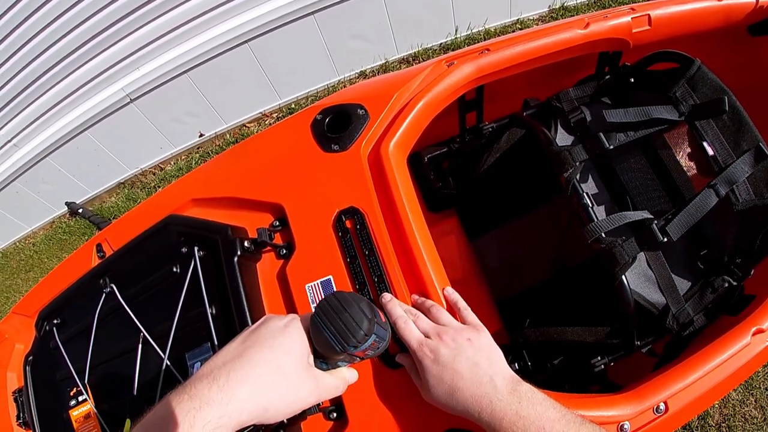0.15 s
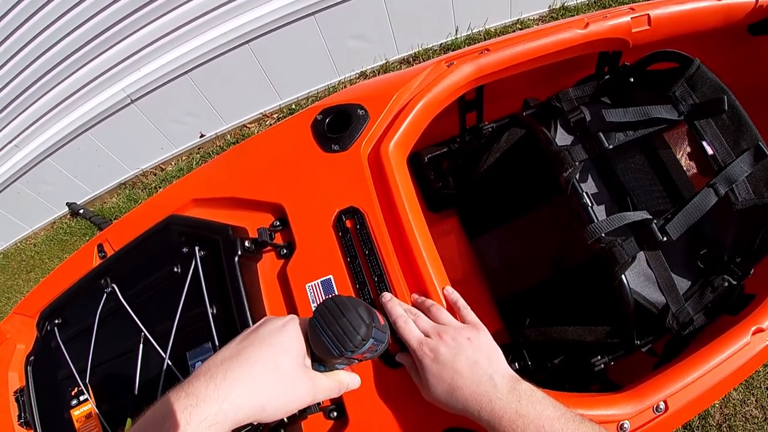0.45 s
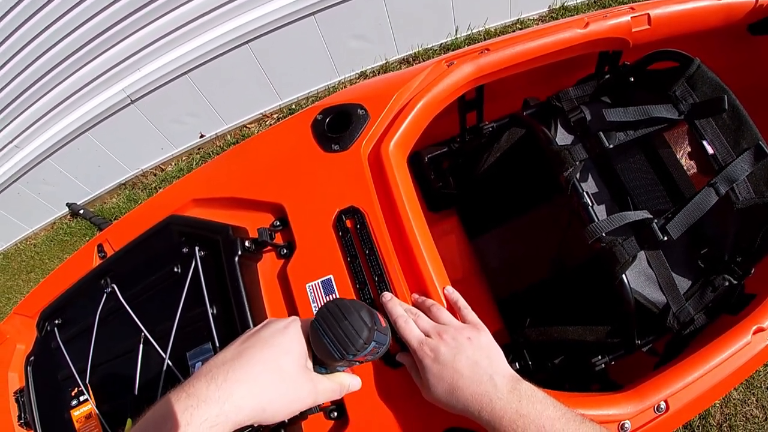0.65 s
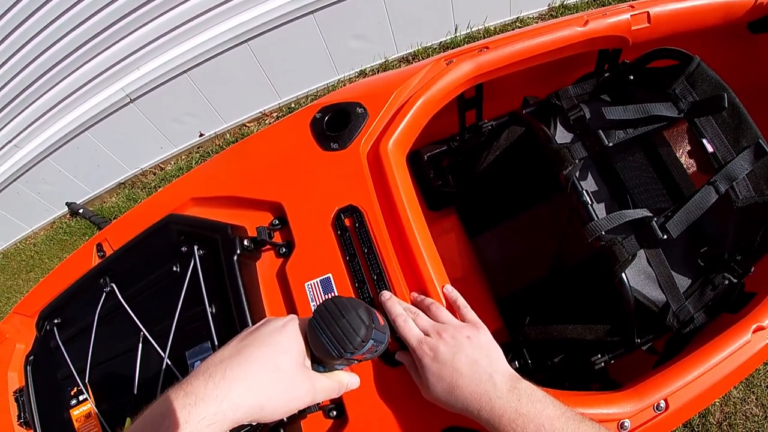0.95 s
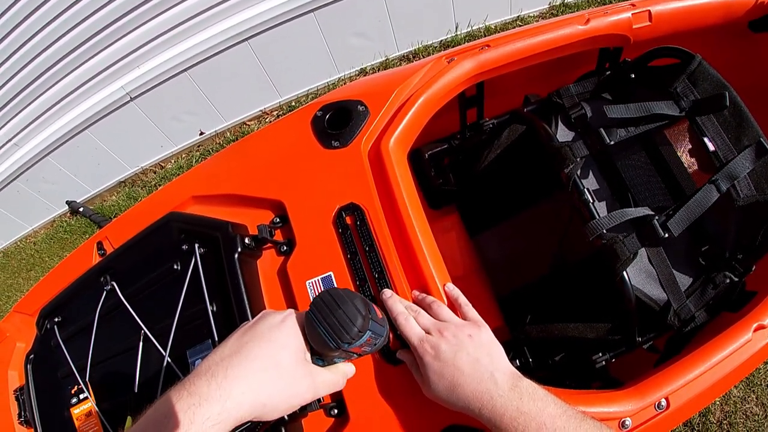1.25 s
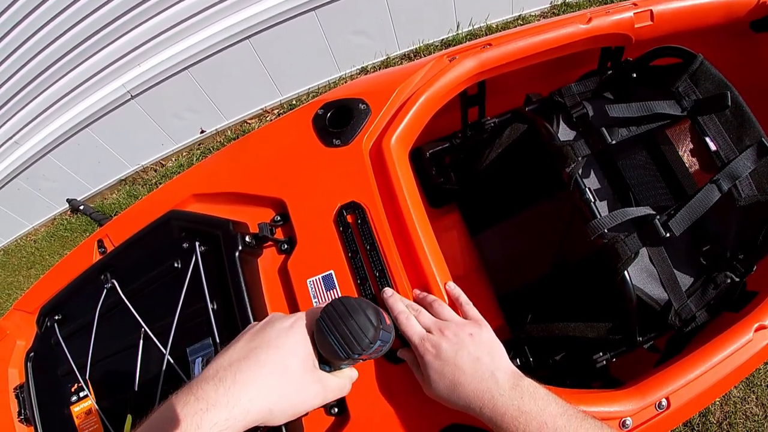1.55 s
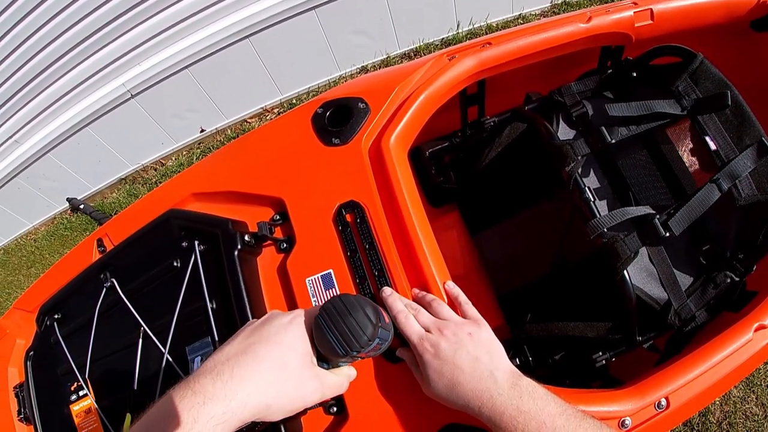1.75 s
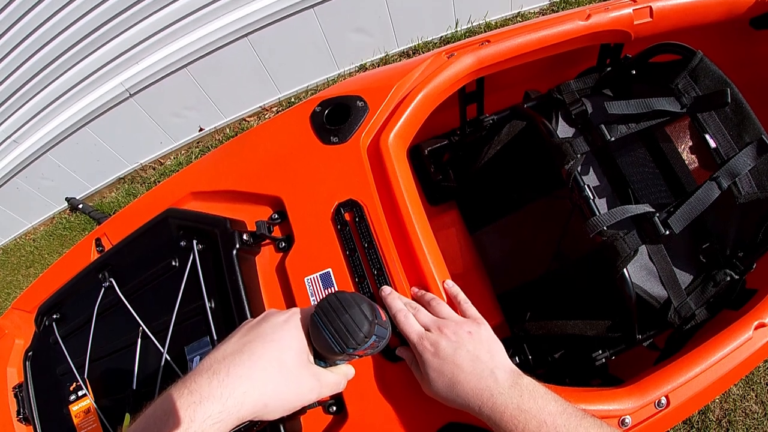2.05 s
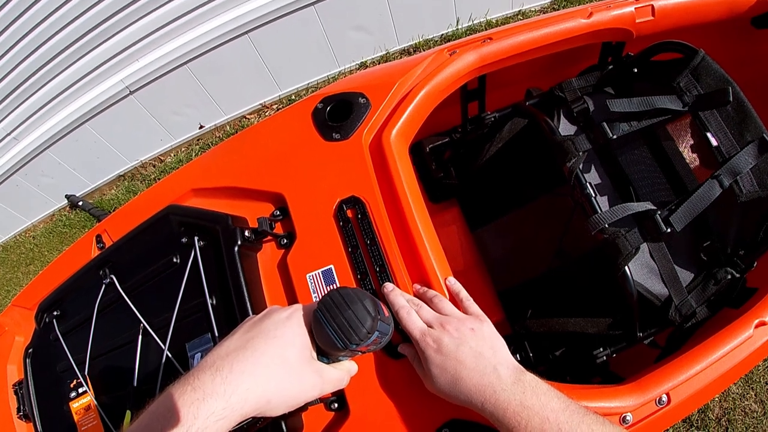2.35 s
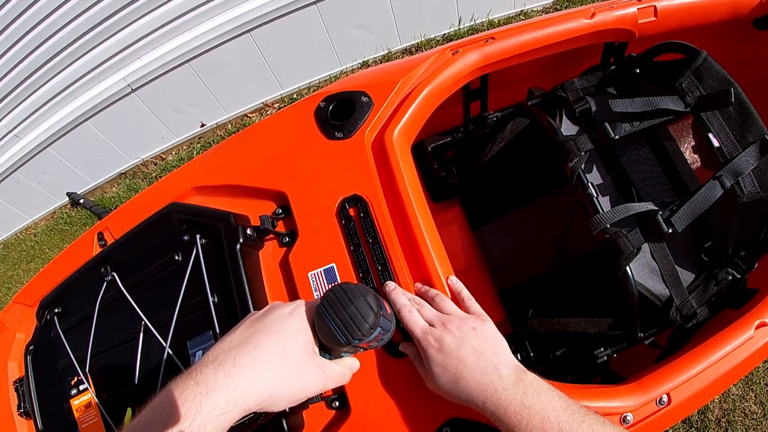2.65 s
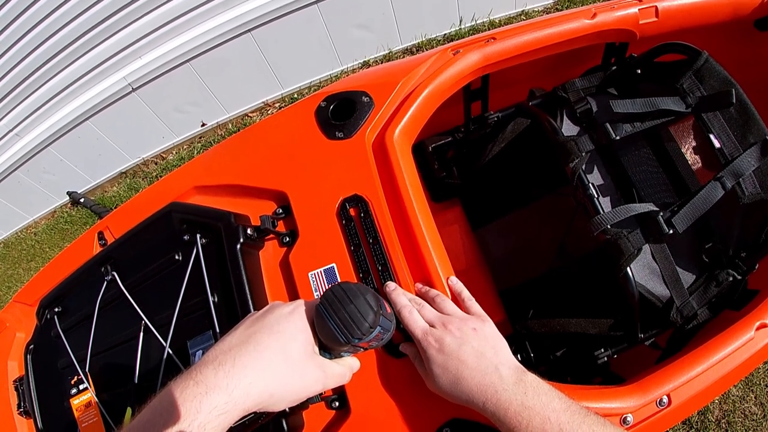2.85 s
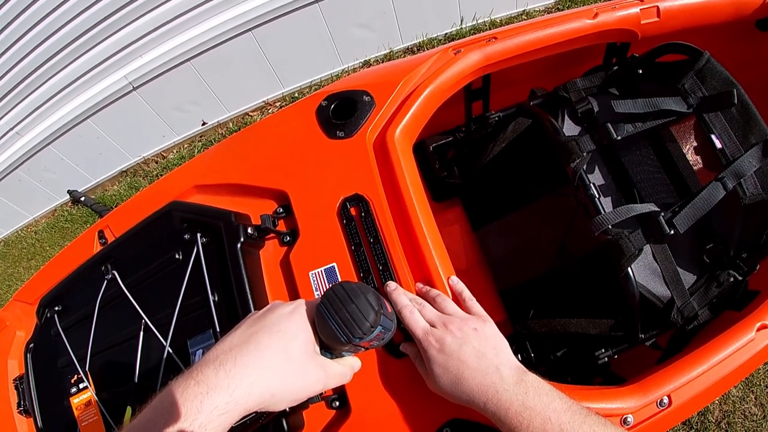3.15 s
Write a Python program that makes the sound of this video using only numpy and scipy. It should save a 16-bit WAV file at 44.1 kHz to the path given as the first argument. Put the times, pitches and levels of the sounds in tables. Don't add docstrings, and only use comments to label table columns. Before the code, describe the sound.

A cordless drill whirs in short bursts, then a longer run climbing in pitch, outdoors

```python
import sys
import numpy as np
from scipy import signal
from scipy.fft import rfft, irfft, next_fast_len
from scipy.io import wavfile
from scipy.ndimage import uniform_filter1d, map_coordinates

SR = 44100
rng = np.random.default_rng(int(sys.argv[2]) if len(sys.argv) > 2 else 0)


def wrap_up_sound(samples):
    columns = np.atleast_2d(samples).T
    tamed = np.clip(columns, -1, 1)
    steps = np.round(tamed * 32767).astype(np.int16)
    wavfile.write(sys.argv[1], SR, steps)


def to_linear_factor(level_db):
    exponent = np.asarray(level_db, float) / 20
    return 10 ** exponent


N = 145530

MESH_PER_SHAFT, SHAFT_PER_CHUCK = 6.65, 18.9


def unit(x):
    return x / np.sqrt(np.mean(x ** 2) + 1e-20)


def curves(rows, t):
    s, *cols = np.transpose(rows)
    return [np.interp(t, s, c) for c in cols]


def wobble(rate, size=N):
    knots = rng.standard_normal(int(size * rate / SR) + 4)
    coarse = map_coordinates(knots, [np.arange(0, size + 16, 16) * rate / SR])
    return np.interp(np.arange(size), np.arange(len(coarse)) * 16, coarse)


def filtered(x, response):
    m = next_fast_len(len(x) + 8192)
    return irfft(rfft(x, m) * response(np.fft.rfftfreq(m, 1 / SR)), m)[:len(x)]


def colour(points):
    f, v = np.transpose(points)
    return lambda hz: to_linear_factor(np.interp(np.log(hz + 1), np.log(f + 1), v, left=-120, right=-120))


# [pitch_hz, width_hz, gain]
HOUSING = [(1190, 900, 0.7), (2520, 66, 0.41), (3110, 53, 0.39), (4650, 180, 0.39), (5560, 150, 0.13),
           (6272, 330, 0.44), (8180, 110, 0.37), (9260, 560, 0.34), (12300, 460, 0.55)]


def housing(f):
    return 1 + sum(g * 1j * f * w / (c * c - f * f + 1j * f * w) for c, w, g in HOUSING)


def noise(points, shell=False, size=N):
    gain = colour(points)
    return unit(filtered(rng.standard_normal(size), lambda f: gain(f) * (housing(f) if shell else 1)))


def patchy(x):
    z = signal.stft(x, nperseg=256)[2]
    field = uniform_filter1d(rng.standard_normal(z.shape), 3, 0)
    field = uniform_filter1d(field, 6, 1)
    depth_db = 2
    return unit(signal.istft(z * to_linear_factor(depth_db * unit(field)), nperseg=256)[1][:len(x)])


# [pitch_hz, level_db]
HUM = [(100, -13.5), (160, -8.5), (208, -2), (450, -20), (1000, -16), (1540, -24.5), (2570, -43.5),
       (4000, -47.5), (15000, -70)]
# [pitch_hz, level_db]
HISS = [(3500, -9), (6800, -4.5), (7900, -3), (8700, -9.5), (14000, -30.5)]


def town():
    hum = to_linear_factor(-53 + 0.6 * wobble(6.3)) * noise(HUM)
    hiss = to_linear_factor(-81.5 + 4 * wobble(110)) * noise(HISS)
    return hum + hiss


# [pitch_hz, level_db]
BUFFET = [(12, -18.5), (20, 1.5), (43, 4), (113, -4.5), (152, -12.5), (238, -24), (300, -49.5), (420, -80)]
# [pitch_hz, level_db]
FLAP = [(90, -17), (170, 2.5), (300, -14.5), (600, -27.5), (1000, -45.5)]
# [time_s, level_db]
BREEZE = [(0, -33.5), (.35, -41.5), (.58, -36), (.68, -40.5), (.9, -33), (1.36, -43), (1.75, -34.5),
          (2.1, -42.5), (2.42, -27.5), (2.63, -51), (2.95, -44.5), (3.14, -54.5), (3.3, -48)]
# [peak_s, level_db, length_s, sharp_edge_db]
GUSTS = [(.012, -30.5, 0.043, 3), (0.114, -26.5, 0.025, 12.5), (0.152, -24.5, 0.041, -2),
         (0.184, -32, 0.016, 10), (0.398, -35, 0.033, 3), (0.304, -33, 0.014, 8), (0.466, -28.5, 0.022, -6),
         (0.545, -29.5, 0.073, 0), (0.78, -36.5, 0.057, 2), (0.99, -26, 0.032, -6), (1.096, -21, 0.077, 3),
         (1.25, -23, 0.039, 5), (1.493, -15.5, 0.029, 16), (1.569, -21.5, 0.047, 9.5),
         (1.648, -26.5, 0.047, 9.5), (1.855, -26.5, 0.062, -3.5), (1.914, -39, .04, -1),
         (2.122, -34.5, 0.017, 10), (2.233, -28, 0.017, 4), (2.296, -24.5, 0.03, 7), (2.349, -22, 0.018, 7),
         (2.397, -30, .03, -2), (2.511, -27, 0.037, -1), (2.705, -34, 0.028, -8), (2.799, -23, 0.036, -7),
         (3.28, -41, 0.092, -8)]


def wind():
    rise_share, flap_db = 0.41, -22
    t = np.arange(0, N + 16, 16) / SR
    power, edge = to_linear_factor(curves(BREEZE, t)[0]) ** 2, 0
    for s, db, length, sharp_db in GUSTS:
        span = np.where(t < s, rise_share * length, length)
        swell = to_linear_factor(2 * db) * np.exp(-((t - s) / span) ** 2)
        power = power + swell
        edge = edge + swell ** 2 / to_linear_factor(2 * db) * to_linear_factor(2 * (flap_db + sharp_db))
    body = noise(BUFFET)
    body = body / np.sqrt(np.abs(uniform_filter1d(body ** 2, size=SR // 16)) + 0.3)
    low, flap = (np.interp(np.arange(N) / SR, t, np.sqrt(p)) for p in (power, edge))
    buffet = to_linear_factor(3.5 * wobble(24.91)) * low * body
    return buffet + to_linear_factor(3 * wobble(44.94)) * flap * noise(FLAP)


# [start_s, peak_db, ring_hz, length_s]
CLICKS = [(.1206, -18.5, 9060, 0.0038), (.1324, -27, 3036, 0.0035), (.136, -36, 432, .004),
          (.1625, -38, 2540, 0.007), (.1784, -38, 3080, 0.0012), (.2882, -42, 3030, 0.0012),
          (.328, -32.5, 5340, 0.0051), (.331, -37.5, 2700, 0.0034), (.4, -37.5, 7450, 0.0033),
          (.4033, -29, 2660, 0.0031), (.6125, -45, 8200, 0.003), (.6295, -36, 5500, .003),
          (.631, -39.5, 1000, 0.0064), (.7018, -37.5, 5230, 0.006), (.727, -31, 6200, 0.0067),
          (.7415, -40, 7500, 0.0027), (.7535, -44, 1810, .005), (.7587, -32, 2540, 0.0075),
          (.7731, -23.5, 8900, 0.0032), (.7844, -29.5, 2340, 0.0054), (1.1974, -31, 3110, 0.00376),
          (1.208, -37, 5000, 0.0046), (1.221, -38, 4800, 0.0075), (1.241, -44, 3000, 0.0037),
          (1.267, -42, 3034, 0.0072), (1.286, -36.5, 2550, 0.0047), (1.3084, -32, 3210, 0.00637),
          (1.3154, -35.5, 1244, 0.0092), (1.3713, -49.5, 3140, 0.0037), (1.707, -57, 6000, 0.0028),
          (1.7305, -39.5, 6630, 0.0045), (1.875, -55, 6300, .003), (1.8776, -45, 2580, 0.004),
          (1.9021, -38.5, 2860, 0.01)]
# [pitch_hz, level_db]
CASE = [(500, -41), (1030, 2), (2210, -2.5), (3220, -1), (3850, -6), (4400, -5), (7840, -7), (15400, -43)]


def clicks():
    ring_db, ring_cycles, ring_late = -1, 17, 0.4005
    hull_db, hull_t60_s, scrape_rise = -24, 0.26, 0.37
    wall_s, wall_db = 0.011, -18.5
    out, t = np.zeros(N + SR), np.arange(SR // 10) / SR
    hull = to_linear_factor(hull_db - 60 * t / hull_t60_s)
    scrapes = noise(CASE, True, 2 * N)
    for k, (s, db, hz, length) in enumerate(CLICKS):
        u = t / np.clip(length, .001, .05)
        shape = (1 - np.exp(-(u / scrape_rise) ** 2)) * np.exp(-u ** 2 * 1.2)
        shape = shape + hull * np.minimum(u, 1)
        scrape = .5 * scrapes[k * len(t):][:len(t)] * shape
        late = np.clip(t - ring_late * length, 0, None)
        decay = to_linear_factor(ring_db - 60 * late * hz / ring_cycles / 2)
        ring = decay * np.sin(2 * np.pi * hz * late) * (1 - np.exp(-late / 0.00026))
        out[round(s * SR):][:len(t)] += to_linear_factor(db) * (scrape + ring)
    wall = filtered(np.roll(out, round(wall_s * SR)),
                    lambda f: np.exp(1j * 40 * np.sin(f / 900)) * f / (f + 3000))
    return (out + to_linear_factor(wall_db) * wall)[:N]


# [pitch_hz, level_db]
FAN = [(2940, -5.5), (5000, -6.5), (7770, -5.5), (8780, -15.5), (9690, -14), (10800, -22.5), (14000, -29),
       (15400, -31.5)]
# [time_s, fan_db]
VENTS = [
    (0, 1),
    (1.5, 0.5),
    (1.9, -38.5),
    (2.6, -11),
    (2.93, -3),
    (3.08, 1.5),
    (3.3, 5.5),
]


def rattle_and_fan(t, mesh, shaft, chuck, third, rattle_colour):
    n, speed = len(t), mesh / SPEEDS_HZ[-1]
    rub_db = (0.5 + THIRD_DB * third) * np.clip(chuck, 0, 1) ** 3 * speed ** 2
    beat = (1 + 0.11 * np.cos(shaft)) * (1 + 0.033 * chuck)
    beat = beat * to_linear_factor(0.54 * wobble(89.65, n) + rub_db)
    rattle = patchy(noise(rattle_colour, True, n))
    dull = 1 - to_linear_factor(3 * np.log2(np.clip(speed, .05, 1)))
    rattle = rattle - dull * filtered(rattle, lambda f: 1 / (1 + (7200 / (f + 1)) ** 12))
    fan_db, = curves(VENTS, t)
    return beat * (rattle + to_linear_factor(-4.5 + fan_db) * noise(FAN, True, n))


# [pitch_hz, level_db]
WHINE = [(4300, -42), (4660, -17), (4760, -2), (4900, -3), (5300, -32)]


def case_whine(shaft, whine_db):
    return to_linear_factor(whine_db) * (1 + 0.22 * np.cos(shaft)) * noise(WHINE, False, len(shaft))


SPEEDS_HZ = [
    890,
    1185,
    1300,
    2185,
]
ORDERS = [1, 1.33, 2, 3, 3.37, 3.41, 3.83, 4.02, 4.97, 6.65, 7.52, 9.11, 10, 10.1, 12.2, 13.3, 16.65, 16.8,
          20.2, 23.6]
# [slow_db, middle_db, brisk_db, full_db]
ORDERS_DB = [(-36, -28, -28, -19), (-40, -45, -35, -21), (-32, -24, -18.5, -18.5), (-11.5, -25, -28, -17),
             (-14, -31, -30, -43), (-40, -49, -31, -15.5), (-38, -46, -40, -27), (-40, -13.5, -16.5, -40),
             (-17, -29.5, -17.5, -21), (-5.5, -6.5, -11, -11), (-40, -38.5, -40, -28), (-40, -40, -37, -32),
             (-40, -45, -16, -16), (-9, -39, -30, -40), (-40, -22, -34.5, -23), (-17, -42, -14, -23),
             (-42, -17, -34, -22), (-10, -40, -45, -37.5), (-15, -40, -40, -40), (-28, -39, -40, -45.5)]


def shaft_tones(mesh, shaft, speed_up, asleep_db, tone_db):
    n, out = len(mesh), 0
    smear_db = 6.5 * np.abs(speed_up)
    for order, db in zip(ORDERS, ORDERS_DB):
        share = 0.086 if abs(order - MESH_PER_SHAFT) < .5 else 0.3
        level_db = np.interp(mesh, SPEEDS_HZ, db) + tone_db - smear_db * share - asleep_db
        level_db = level_db + 2.5 * wobble(21.13, n)
        drift = 0.45 * np.log(order + 1) * wobble(25.15, n)
        out = out + to_linear_factor(level_db) * np.sin(order * shaft + drift)
    return out


SIDEBANDS_DB = [-1, -4, 0, 1, -1, -1, -2]


def mesh_comb(mesh, shaft, comb_db):
    n, out = len(mesh), 0
    mode_hz, width_hz = 4790, 300
    for k, db in enumerate(SIDEBANDS_DB):
        order = 4 * MESH_PER_SHAFT + k - 2
        pitch_hz = order * mesh / MESH_PER_SHAFT
        mode = 1 / (1 + ((pitch_hz - mode_hz) / width_hz * 2) ** 2)
        level = to_linear_factor(comb_db + db + 1.1 * wobble(30.3, n))
        out = out + level * mode * np.sin(order * shaft + 0.35 * wobble(24.9, n))
    return out


GRIND_DB = [-10.5, -28.5, -12.5, -4.5]


def gear_grind(mesh, shaft, chuck, third, speed_up):
    n, width = len(mesh), 0.0503
    spread = width * np.cumsum(mesh * wobble(260, n)) * 2 * np.pi / SR
    grind = np.sin(MESH_PER_SHAFT * .97 * shaft + spread) * to_linear_factor(1.9 * wobble(120, n))
    pull_db = 0.5 * np.clip(speed_up, 0, 8) * (mesh > SPEEDS_HZ[2])
    level_db = np.interp(mesh, SPEEDS_HZ, GRIND_DB) + 5 * chuck + THIRD_DB * third + pull_db
    return to_linear_factor(level_db) * grind


KNOCK_S, THIRD_DB = 3.045, 2


def motor(run, rattle_colour, tone_db, whine_db, comb_db):
    t = np.arange(N) / SR
    near = t[(t > run[0][0] - .03) & (t < run[-1][0] + .03)]
    n = round((len(near) + 4096) // 8192 + 1) * 8192
    t = near[0] + np.arange(n) / SR
    mesh, level_db = curves(run, t)
    shaft = 2 * np.pi * np.cumsum(mesh) / MESH_PER_SHAFT / SR
    chuck_turn = (shaft - np.interp(KNOCK_S, t, shaft)) / SHAFT_PER_CHUCK
    chuck, third = np.cos(chuck_turn), np.cos(chuck_turn / 3)
    speed_up = np.gradient(mesh) * SR / 1000
    asleep_db = 7 * np.clip(900 - mesh, 0, None) / 100
    out = rattle_and_fan(t, mesh, shaft, chuck, third, rattle_colour)
    out = out + case_whine(shaft, whine_db - asleep_db)
    out = out + shaft_tones(mesh, shaft, speed_up, asleep_db, tone_db)
    out = out + mesh_comb(mesh, shaft, comb_db - asleep_db)
    out = out + gear_grind(mesh, shaft, chuck, third, speed_up)
    whole = np.zeros(N + n)
    running = (t >= run[0][0]) & (t <= run[-1][0])
    whole[round(t[0] * SR):][:n] = out * to_linear_factor(level_db) * running
    return whole[:N]


# [time_s, mesh_hz, rattle_db]
FIRST = [
    (0, 1202, -42.5),
    (.115, 1198, -43.5),
    (.14, 750, -43.5),
    (.19, 300, -91),
    (.3, 100, -67),
]
# [time_s, mesh_hz, rattle_db]
BURST = [(.7, 101, -61), (.735, 303, -62.5), (.76, 502, -46.5), (.8, 892, -45), (.85, 1095, -42.5),
         (.92, 1163, -40.5), (.96, 1187, -41), (1.17, 1185, -41), (1.198, 1112, -43), (1.23, 606, -65),
         (1.42, 101.7, -78)]
# [time_s, mesh_hz, rattle_db]
LONG = [(1.905, 301, -56), (1.94, 642.6, -48), (2, 826, -49), (2.05, 868.6, -46), (2.22, 874, -46.5),
        (2.33, 910, -46), (2.39, 1167, -41.5), (2.45, 1292, -43), (2.615, 1315, -43), (2.64, 1481, -38),
        (2.67, 1679, -39), (2.75, 2065, -37.5), (2.86, 2181, -38), (3.3, 2188, -38)]
# [pitch_hz, level_db]
OPEN = [(300, -7), (700, -10.5), (1200, -10), (3000, -7.5), (3720, -23), (4700, -6), (7000, -15),
        (9100, -19)]
# [pitch_hz, level_db]
SHUT = [(300, -12.5), (900, -6), (3300, -1.5), (3800, -13), (5960, -4), (7200, -18), (11000, -24),
        (15400, -31)]


def drill():
    first = motor(FIRST, OPEN, tone_db=-7, whine_db=-24, comb_db=-10)
    burst = motor(BURST, OPEN, tone_db=1.5, whine_db=-21, comb_db=-1.5)
    long_run = motor(LONG, SHUT, tone_db=4.2, whine_db=-17, comb_db=-15)
    return first + burst + long_run


def scene():
    return (town() + wind() + clicks() + drill())[None]


def low_pass(x):
    return signal.sosfilt(signal.butter(12, 15500, fs=SR, output="sos"), x)


def record(dry):
    mix = filtered(dry[0], lambda f: 1 / (1 + (f / 14600) ** 24))[None]
    return low_pass(mix)


dry = scene()
out = record(dry)
wrap_up_sound(out)
```